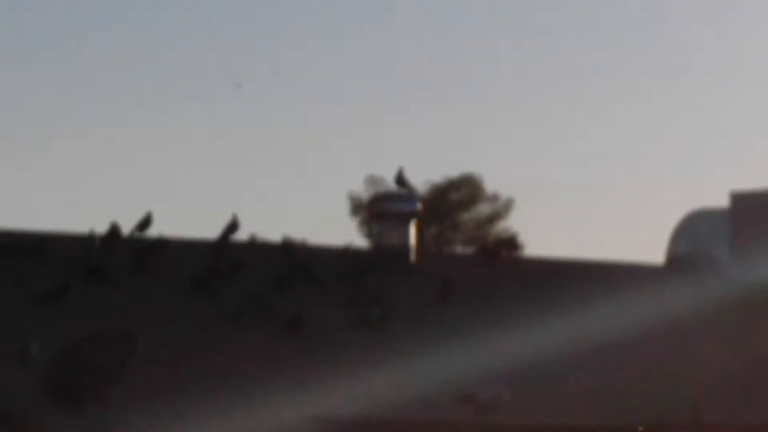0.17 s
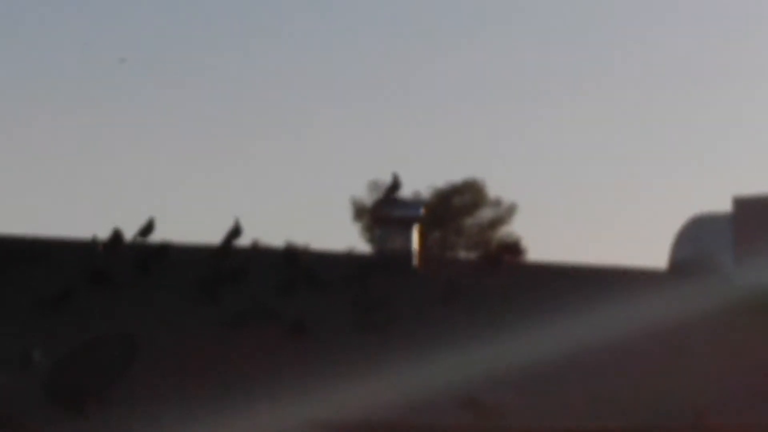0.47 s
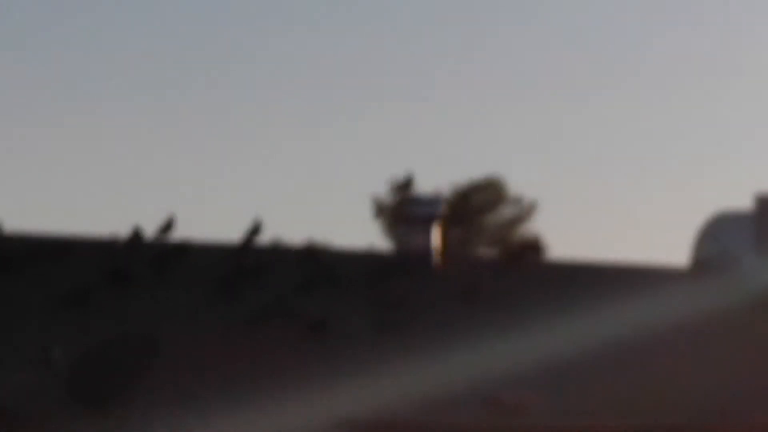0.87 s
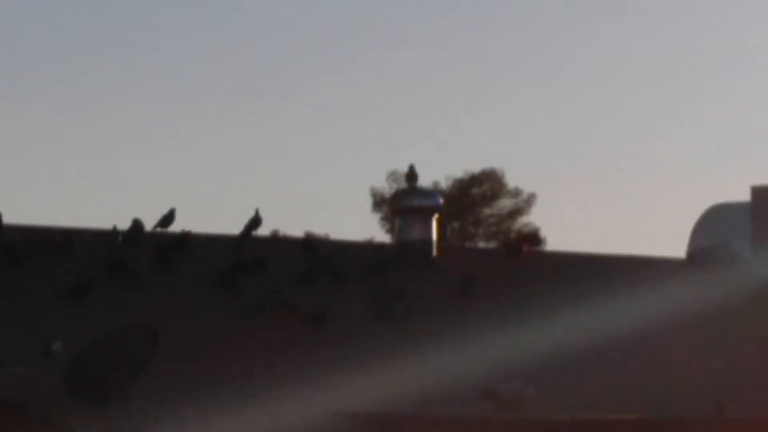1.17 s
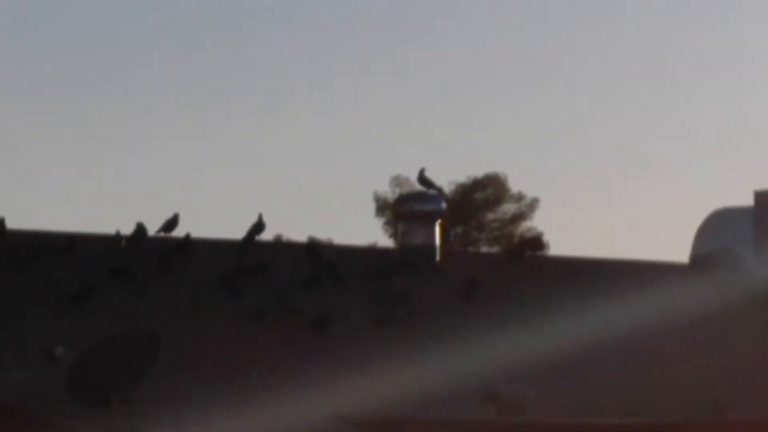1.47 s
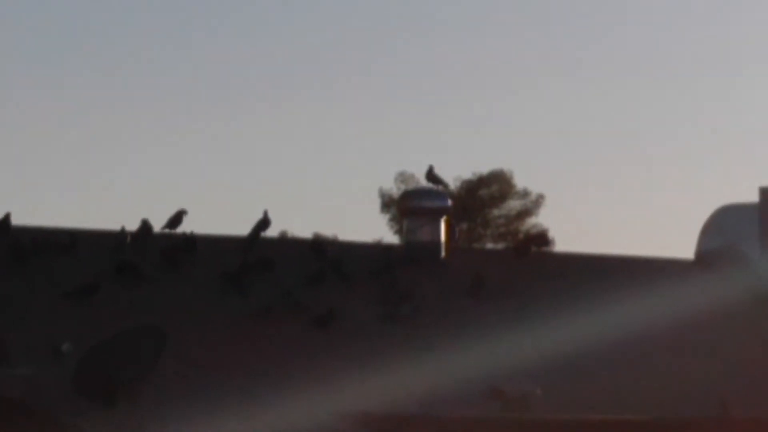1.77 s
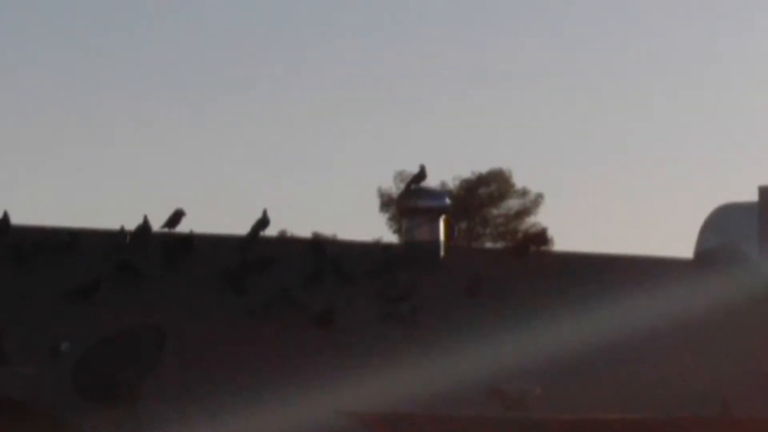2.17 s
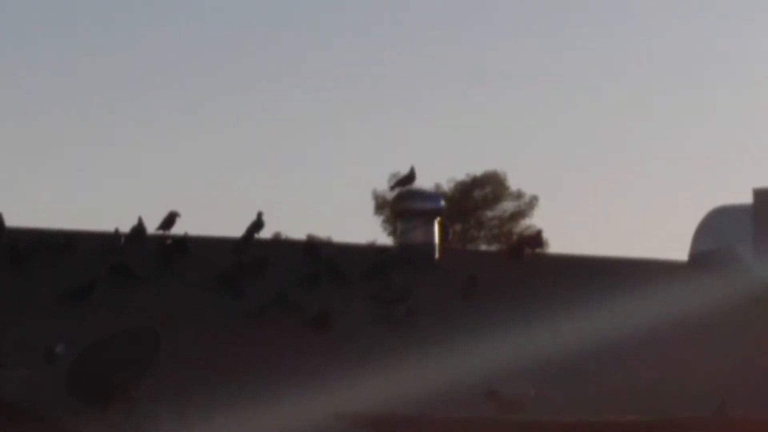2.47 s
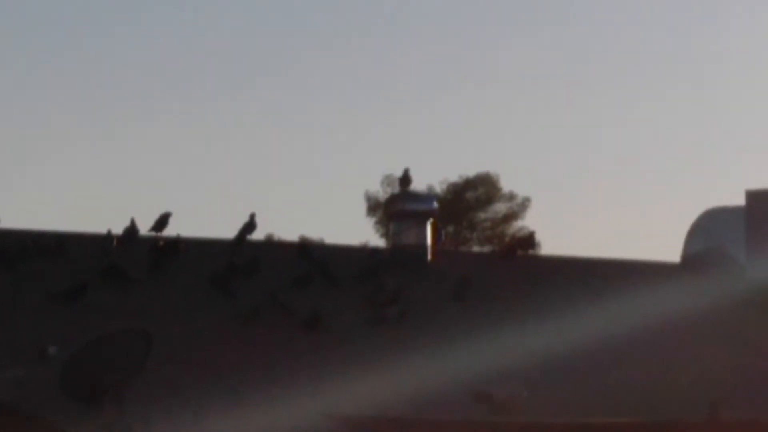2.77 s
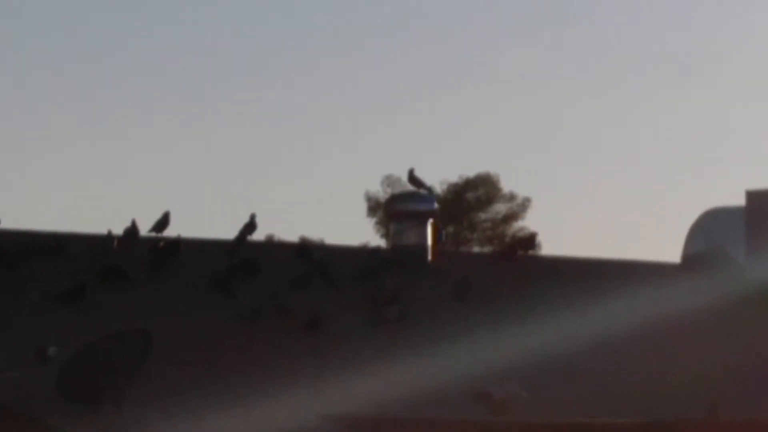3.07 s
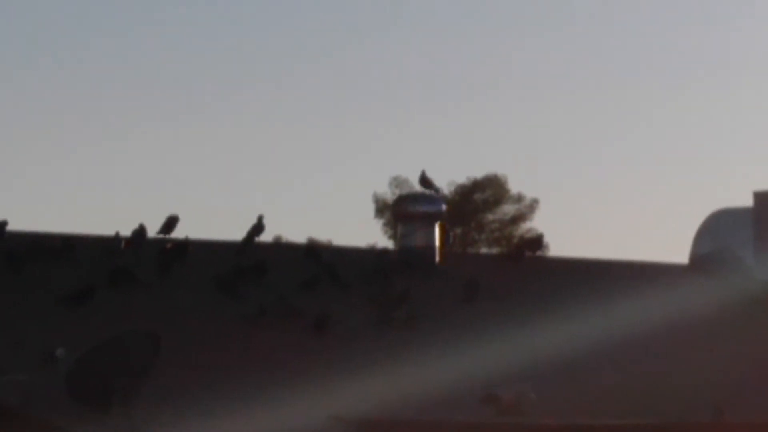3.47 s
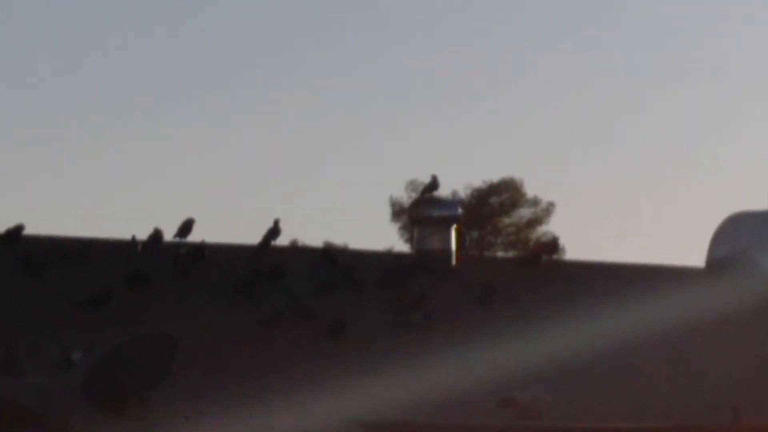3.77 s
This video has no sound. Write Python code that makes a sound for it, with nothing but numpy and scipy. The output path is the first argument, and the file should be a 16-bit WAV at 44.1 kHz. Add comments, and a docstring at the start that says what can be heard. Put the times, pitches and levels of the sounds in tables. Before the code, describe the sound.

Birds chirping, one nearby and a distant flock, over a low town rumble.

```python
"""A town roof at dusk. Over a low rumble and the hum of distant machinery, a far flock twitters in
short arched notes. A hand clicks and rustles on the camera's case, mostly in the first second.
A near bird gives two pairs of quick rising whistles with a soft slur inside each pair.
The calls are gliding, trembling tones with overtones; walls and roofs echo them."""
import sys
import numpy as np
from scipy import signal
from scipy.fft import rfft, irfft
from scipy.io import wavfile
from scipy.ndimage import uniform_filter1d

SR = 44100
rng = np.random.default_rng(int(sys.argv[2]) if len(sys.argv) > 2 else 0)


def master_out(mix):
    """Clip the mix to full scale and print it as 16-bit PCM to the path in sys.argv[1]."""
    frames = np.transpose(np.atleast_2d(mix))
    ceiling = np.clip(frames, -1, 1)
    pcm = np.round(ceiling * 32767).astype(np.int16)
    wavfile.write(sys.argv[1], SR, pcm)


N = 172872
YARD_T60_S = .44


def undb(db):
    """Decibels to gain."""
    return 10 ** (np.asarray(db) / 20)


def unit(x):
    """Scale to rms 1."""
    return x / np.sqrt(np.mean(x ** 2))


def noise(points):
    """Noise of rms 1, coloured by (f/Hz, relative level/dB) points and falling steeply beyond them."""
    hz, db = np.array(points).T
    log_f = np.log(np.maximum(np.fft.rfftfreq(N, 1 / SR), 1))
    beyond = np.abs(log_f - np.clip(log_f, np.log(hz[0]), np.log(hz[-1])))
    colour = undb(np.interp(log_f, np.log(hz), db)) * np.exp(-10 * beyond)
    return unit(irfft(rfft(rng.standard_normal(N)) * colour, N))


def walk(rate_hz):
    """Smooth random wander with a spread of 1."""
    hold = max(int(SR / rate_hz), 1)
    return unit(uniform_filter1d(rng.standard_normal(N)[np.arange(N) // hold], hold))


def add(out, start_s, x):
    """Mix a sound in at a time."""
    i = int(np.clip(start_s * SR, 0, N - 1))
    out[i:i + len(x)] += x[:N - i]


def reverb(x, wet_db, t60_s=YARD_T60_S):
    """Diffuse echo of roofs and walls, wet signal only."""
    t = np.arange(int(.7 * SR)) / SR
    tail = rng.standard_normal(len(t)) * np.exp(-np.log(1000) * t / t60_s) * (1 - np.exp(-t / .0039))
    return undb(wet_db) * signal.fftconvolve(x, tail / np.linalg.norm(tail))[:N]


def town(air_db=-53.5, waver_db=.86):
    """The bed: low rumble, wavering machine hums and a faint wash of air."""
    # colours of rumble and air: f/Hz, relative level/dB
    rumble_colour = [(28, -26), (50, -10), (68, 0), (96, 4.5), (120, -3), (148, 0), (177, -12), (225, -1),
                     (255, -14), (310, -10.5), (355, -13), (420, -18.5), (520, -44.5)]
    air_colour = [(400, -5.5), (500, -10), (620, -1), (850, 4), (1050, -2), (1450, -10), (1900, -16),
                  (2550, -13), (3400, -6), (4500, -12), (5900, -10), (6700, -27), (7900, -18), (9000, -27),
                  (10400, -22), (12500, -28.5), (15500, -29)]
    # slow ebb of the rumble: t/s, level/dB
    rumble_ride = [(.4, -41), (1.2, -42), (1.7, -44), (2.7, -45), (3.1, -43.5)]
    # distant machinery: f/Hz, width/Hz, level/dB
    machines = [(218.3, 12, -53), (281, 8.7, -62.5), (1413, 3.344, -71)]
    t, hums = np.arange(N) / SR, np.zeros(N)
    rumble = noise(rumble_colour) * undb(np.interp(t, *np.array(rumble_ride).T))
    for hz, width, db in machines:
        phase = 2 * np.pi * hz * t
        hums += undb(db) * (walk(width) * np.sin(phase) + walk(width) * np.cos(phase))
    return rumble + hums + noise(air_colour) * undb(air_db + waver_db * walk(4.74))


def sing(notes, warble, fade=.35, overtone_db=-20.5, overtone_top_hz=9000):
    """Notes that bend to a middle pitch and away again; the higher they go, the more they tremble."""
    out, wobble = np.zeros(N), walk(900)
    offsets = rng.integers(0, N, len(notes))
    for (at, length, first_hz, middle_hz, last_hz, db), offset in zip(notes, offsets):
        u = np.linspace(-1, 1, int(length * SR))
        hz = middle_hz + (np.where(u < 0, first_hz, last_hz) - middle_hz) * u * np.sin(np.pi * u / 2)
        tremble = wobble.take(offset + np.arange(len(u)), mode="wrap") * np.sqrt(hz / 3900)
        phase = 2 * np.pi * np.cumsum(hz * (1 + warble * tremble)) / SR
        overtone = undb(overtone_db) / (1 + (2 * hz / overtone_top_hz) ** 10) * np.sin(2 * phase)
        add(out, at, undb(db) * (np.sin(phase) + overtone) * signal.windows.tukey(len(u), fade))
    return out


def chatter(count, centre_hz, db, spread=.15, arch=.26, length_s=.045, uneven_db=3):
    """The farthest birds: a list of random arched notes strewn over the whole scene."""
    notes = []
    for k, (when, pitch, rise, fall, strength, span) in enumerate(rng.random((count, 6))):
        at = (k + 2 * when) / count * N / SR
        hz = centre_hz * (1 + spread * (2 * pitch - 1))
        level = db + uneven_db * (2 * strength - 1)
        notes.append((at, length_s * (.5 + span), hz * (1 - arch * rise), hz, hz * (1 - arch * fall), level))
    return notes


def arched(notes, ends=.78):
    """Notes that start and end at the same share of their top pitch."""
    return [(at, length, ends * hz, hz, ends * hz, db) for at, length, hz, db in notes]


def flock(flutter_db=3, trim_db=-2):
    """Calls from across the roofs over fainter chatter, blurred by scatter off the tiles."""
    # arched twitters, hoarse calls, thin high chips: t/s, length/s, top f/Hz, relative level/dB
    twitters = [(.064, 0.026, 4100, -42), (.374, 0.031, 4200, -40), (.488, 0.059, 5620, -40),
                (.528, .07, 5750, -38.5), (.58, 0.05, 4305, -39), (.649, 0.046, 4400, -41.5),
                (.715, 0.037, 3950, -41.5), (.805, 0.044, 4030, -44), (.885, 0.047, 3950, -42),
                (1.025, .09, 5950, -45), (1.621, 0.041, 3600, -41), (1.622, .056, 5450, -41.5),
                (1.833, 0.049, 3800, -48), (1.844, 0.073, 6350, -52), (1.893, 0.038, 3600, -55),
                (1.929, 0.064, 6250, -44.5), (2.172, 0.055, 5400, -41.5), (2.544, 0.042, 3850, -40),
                (2.553, 0.057, 6150, -42.5), (2.608, 0.056, 5900, -38), (2.685, 0.045, 4370, -43),
                (3.095, 0.045, 3840, -46.5), (3.435, 0.051, 3850, -44.5)]
    rasps = [(.358, .044, 5340, -39.5), (1.566, .054, 4270, -39.5), (2.428, 0.041, 4590, -43),
             (2.995, .074, 4595, -42), (3.185, 0.059, 3890, -48.5)]
    chips = [(2.825, .035, 5950, -49), (2.925, 0.04, 5900, -49.5), (3.04, 0.03, 5780, -47),
             (3.04, 0.029, 7900, -53.5)]
    # falling notes: t/s, length/s, first f/Hz, middle f/Hz, last f/Hz, relative level/dB
    falls = [(0.621, 0.03, 4120, 3315, 2840, -36), (2.483, .047, 4390, 3816, 3380, -42.5),
             (3.391, .03, 4820, 3720, 3480, -40.5)]
    faint = chatter(count=120, centre_hz=3780, db=-55)
    faint += chatter(count=70, centre_hz=5200, db=-55.5)
    faint += chatter(count=45, centre_hz=7580, db=-63.5, spread=.08, arch=.11)
    calls = sing(arched(twitters) + falls + faint, warble=.023)
    calls += sing(arched(rasps), warble=.08)
    calls += sing(arched(chips), warble=.063, fade=.4)
    calls *= undb(flutter_db * walk(250) + trim_db)
    tiles = reverb(calls, wet_db=-4.5, t60_s=.03)
    return calls + tiles + reverb(calls, wet_db=-4.5)


def handling(click_s=.005, knock_s=.023, tick_s=.0011, grain_db=3, rub_lift_db=2.5):
    """A hand on the camera's case: clicks with a hollow knock, dry ticks and gritty rubs."""
    # clicks: t/s, click level/dB, knock level/dB
    click_cues = [(0.149, -38.5, -41), (.178, -40, -55), (.432, -33.5, -41.5), (.435, -31, -59),
                  (0.457, -35, -63), (.46, -38, -64), (0.551, -45, -41), (0.571, -58, -49),
                  (0.725, -40.5, -60)]
    # tiny ticks: t/s, level/dB
    tick_cues = [(.432, -40), (.46, -45), (.726, -46), (2.527, -53), (2.682, -47)]
    # rubs: middle t/s, half width/s, relative level/dB
    rub_cues = [(0.128, 0.044, -52), (0.289, 0.023, -51), (0.467, 0.035, -44), (0.56, 0.066, -58.5),
                (0.727, 0.24, -60), (1.184, 0.054, -52.5)]
    # colours of the case, its knock and its tick: f/Hz, relative level/dB
    case_colour = [(300, -23), (1000, -9), (2200, -1), (3500, 5.5), (5800, 10.5), (6700, -1), (8000, 4),
                   (9000, -12.5), (10500, -0.5), (12500, -30), (16000, -36)]
    knock_colour = [(150, -8), (500, -5.5), (850, 5), (1700, -4), (3000, -0.5), (6000, -11), (16000, -44)]
    tick_colour = [(5000, -12), (8000, 4), (11000, 3), (13500, -12), (16000, -18)]
    t = np.arange(N) / SR
    decay = lambda at, decay_s: (t >= at) * np.exp(-np.abs(t - at) / decay_s)
    clicks = sum(undb(db) * decay(at, click_s) for at, db, _ in click_cues)
    knocks = sum(undb(db) * decay(at, knock_s) for at, _, db in click_cues)
    ticks = sum(undb(db) * decay(at, tick_s) for at, db in tick_cues)
    rubs = sum(undb(db) * np.exp(-((t - at) / half) ** 2) for at, half, db in rub_cues)
    rubs *= undb(grain_db * walk(500) + rub_lift_db)
    out = (clicks + rubs) * noise(case_colour) + knocks * noise(knock_colour) + ticks * noise(tick_colour)
    return out + reverb(out, wet_db=-11)


def near_bird(rough=.022, flutter_db=2.5, harmonic_step_db=3.5, dull_hz=4300):
    """Whistles that swell and flick upward, overtones glinting through resonances; husky slurs between."""
    # whistles: peak t/s, f/Hz, level/dB, lead-in/s, swell/s, flick/s, flick exponent, overtone trim/dB
    whistles = [(1.125, 3600, -26.5, .062, .015, .018, .8, -20),
                (1.324, 3650, -32, .048, .016, .02, .5, -20),
                (3.602, 3650, -21.5, .068, .010, .028, .95, -25),
                (3.794, 3700, -21.5, .052, .012, .022, 1.1, -25)]
    # whistle shape: place (-1 start, -.2 swell begins, 0 peak, 1 end), pitch ratio, relative level/dB
    sweep = [(-1, .41, -37), (-.66, .56, -20), (-.32, .75, -18), (-.2, .83, -7), (0, .98, 0),
             (.25, 1.2, -4), (.55, 1.42, -20), (1, 1.54, -29)]
    # resonances that colour the overtones: f/Hz, gain/dB
    resonances = [(4500, 6), (5700, 8.5), (6500, -14.5), (7600, -2), (8800, -20.5), (9800, -1),
                  (10500, -15), (11400, -24), (15000, -32)]
    # soft slurs: t/s, length/s, first f/Hz, middle f/Hz, last f/Hz, level/dB
    slurs = [(1.183, 0.055, 1356, 2047, 2580, -47), (1.54, 0.04, 1740, 2400, 3340, -55.5),
             (3.66, .052, 1330, 2150, 3160, -46.5)]
    # slaps off the nearest walls: delay/s, gain/dB
    walls = [(.0042, -12), (.0105, -13), (.021, -21)]
    t, tone, overtones = np.arange(N) / SR, np.zeros(N), np.zeros(N)
    place, ratio, shape_db = np.array(sweep).T
    wobble, flutter = walk(600), flutter_db * walk(300)
    for at, hz, level_db, lead, rise, flick, height, overtone_db in whistles:
        on = (t > at - lead) & (t < at + flick)
        u = np.interp(t[on] - at, [-lead, -rise, 0, flick], [-1, -.2, 0, 1])
        glide = np.interp(u, place, ratio) ** np.where(u > 0, height, 1)
        pitch = hz * glide * (1 + rough * wobble[on])
        phase = 2 * np.pi * np.cumsum(pitch) / SR
        swell = undb(level_db + np.interp(u, place, shape_db) + flutter[on])
        swell *= signal.windows.tukey(len(u), .08)
        add(tone, at - lead, swell * np.sin(phase))
        for k in range(2, 6):
            glint_db = np.interp(k * pitch, *np.array(resonances).T)
            gain = undb(overtone_db + harmonic_step_db * (k - 2) + glint_db) * (k * pitch < SR / 2)
            add(overtones, at - lead, swell * gain * np.sin(k * phase))
    eaves = reverb(overtones, wet_db=3.5, t60_s=.21)  # quick scatter under the eaves
    song = tone + overtones + eaves + sing(slurs, warble=.14, fade=.56) * undb(flutter)
    slaps = sum(undb(db) * np.interp(t - delay, t, song) for delay, db in walls)
    dulled = signal.sosfilt(signal.butter(4, dull_hz, fs=SR, output="sos"), song)
    return song + slaps + reverb(dulled + overtones, wet_db=-6)


def scene():
    """Birds, hand and town in mono."""
    return (near_bird() + flock() + handling() + town())[None]


def record(dry, start_s=.072, top_hz=15750):
    """The sound cuts in after a moment of silence, its highest treble shaved off."""
    running = np.arange(N) / SR >= start_s
    return signal.sosfilt(signal.ellip(10, .2, 70, top_hz, fs=SR, output="sos"), dry * running)


dry = scene()
out = record(dry)
master_out(out)
```